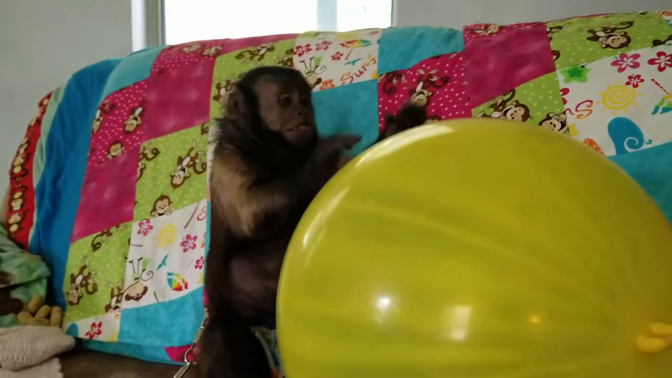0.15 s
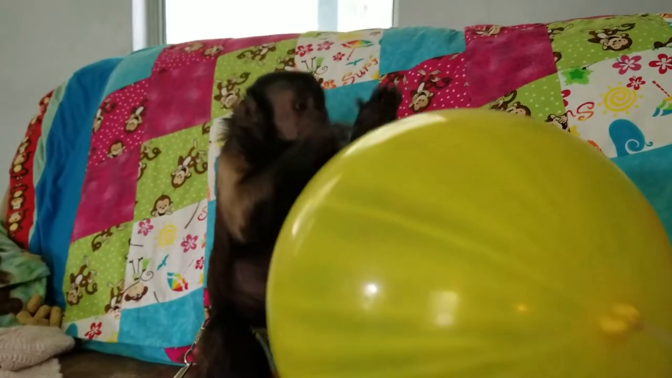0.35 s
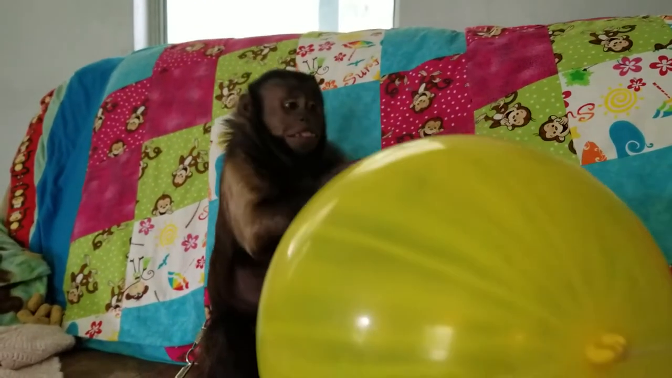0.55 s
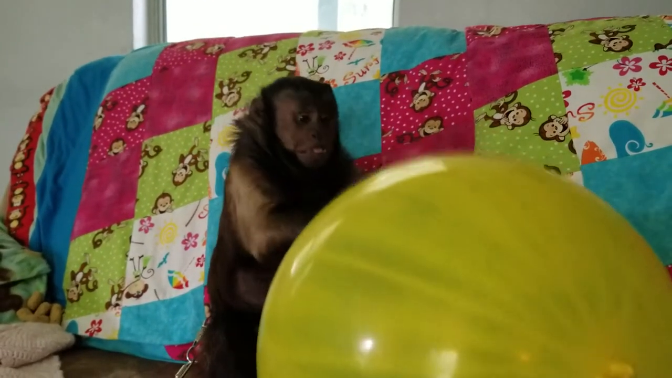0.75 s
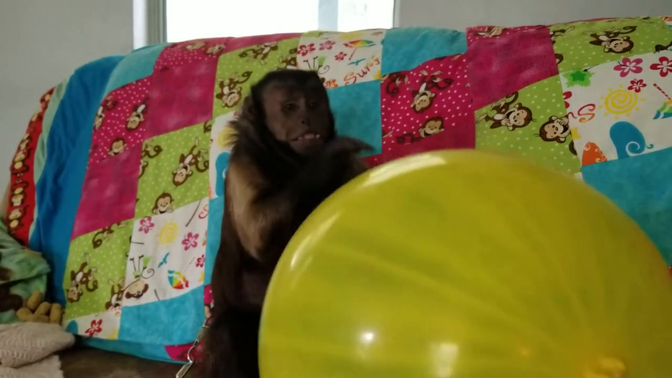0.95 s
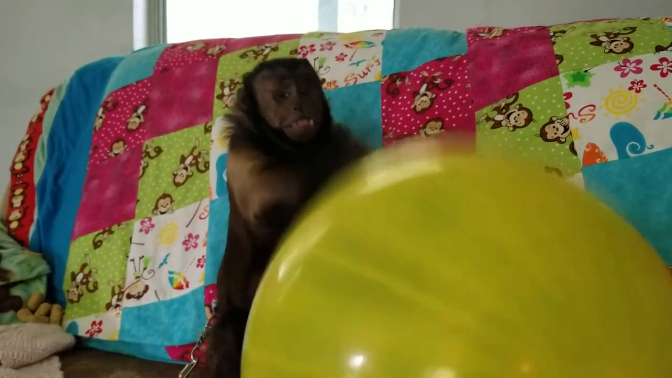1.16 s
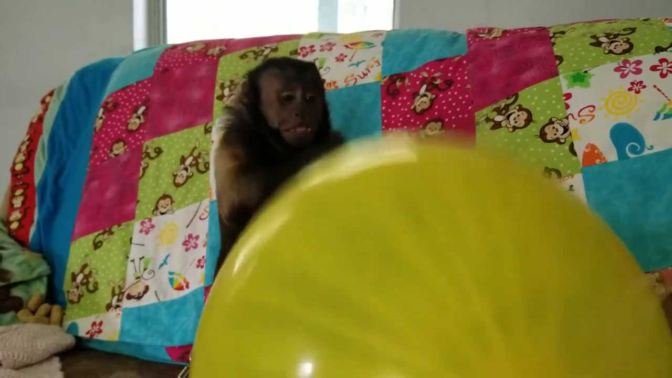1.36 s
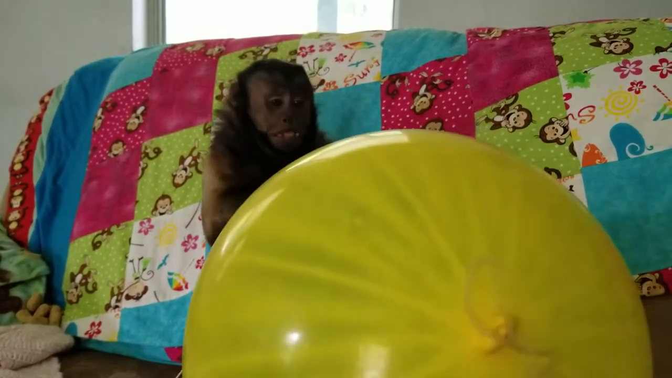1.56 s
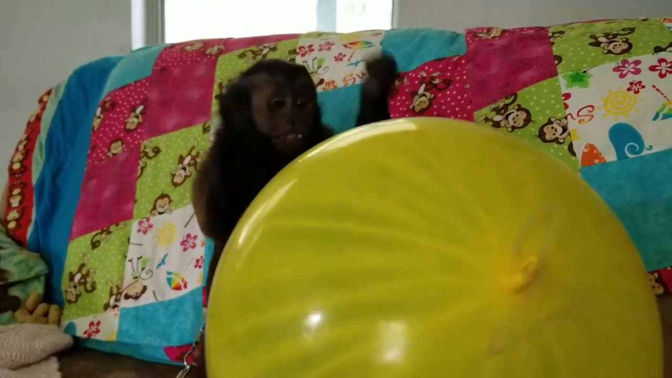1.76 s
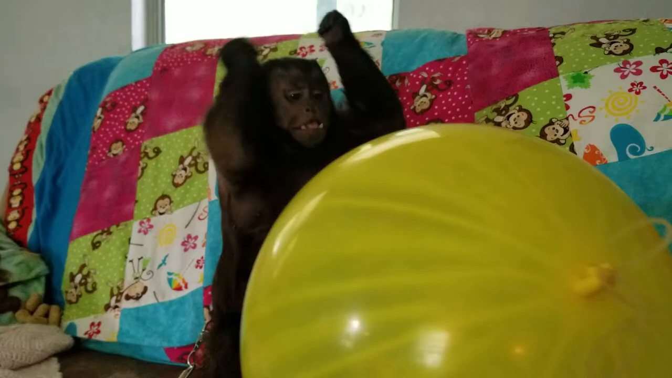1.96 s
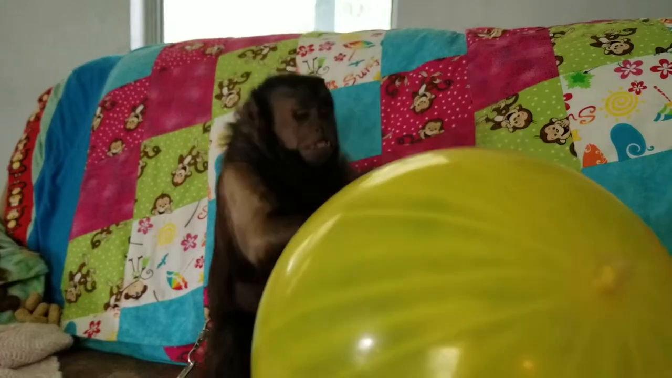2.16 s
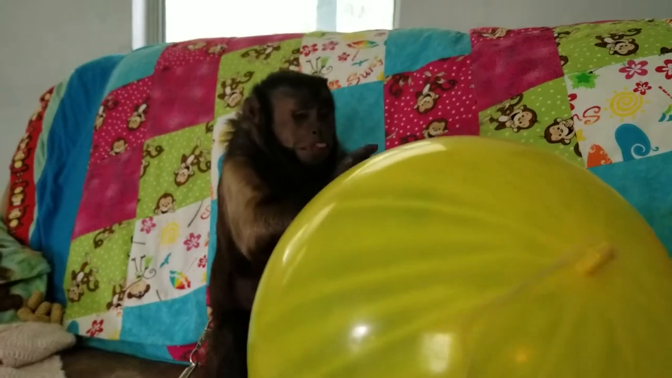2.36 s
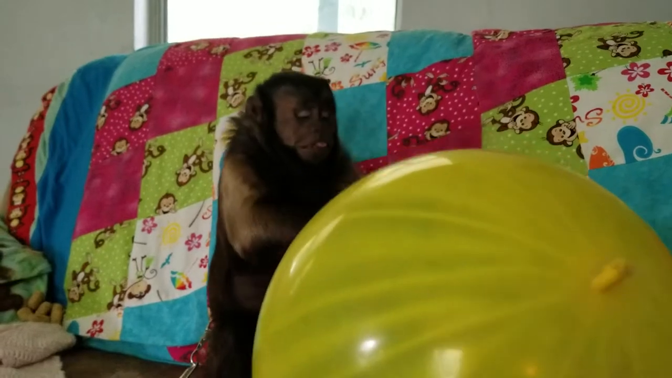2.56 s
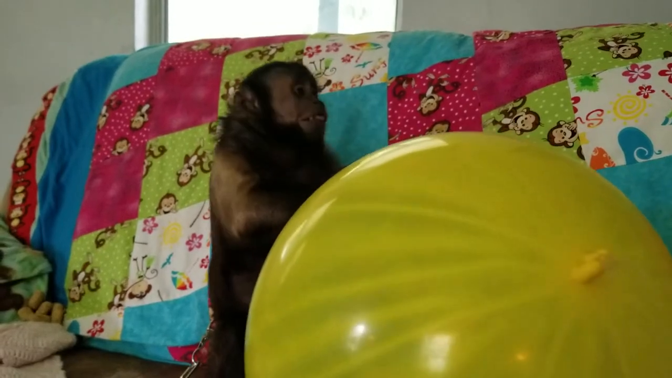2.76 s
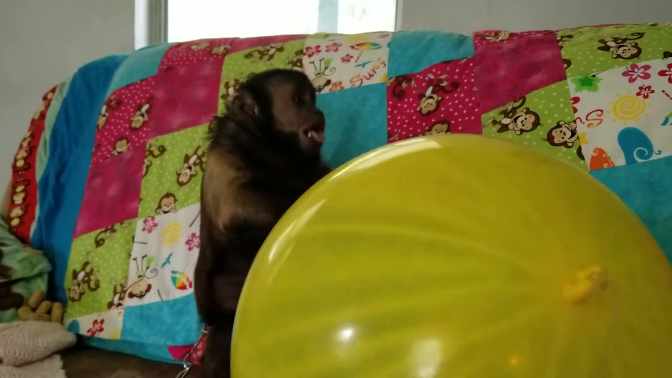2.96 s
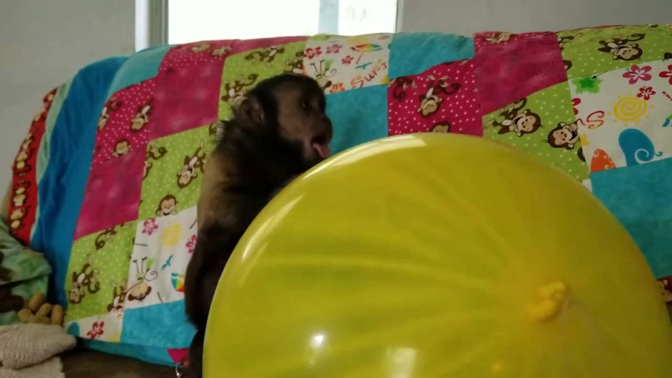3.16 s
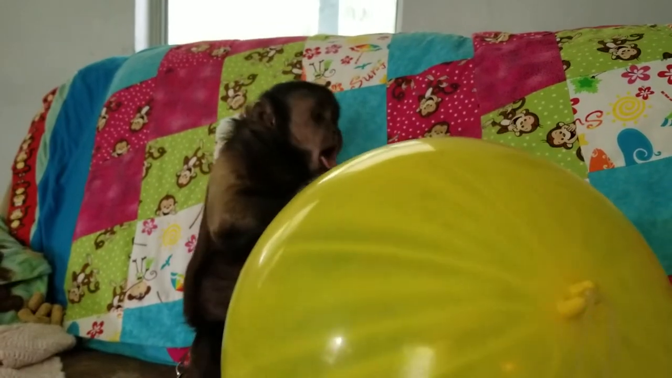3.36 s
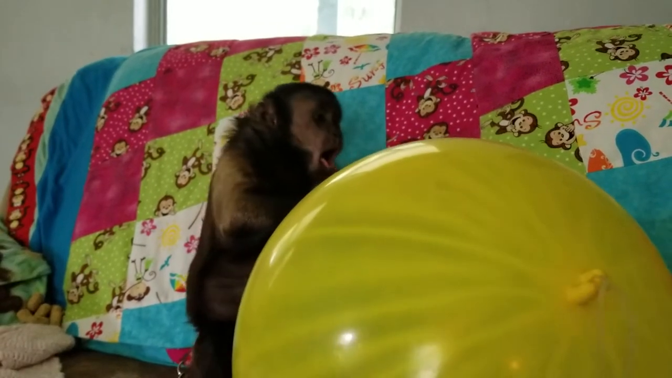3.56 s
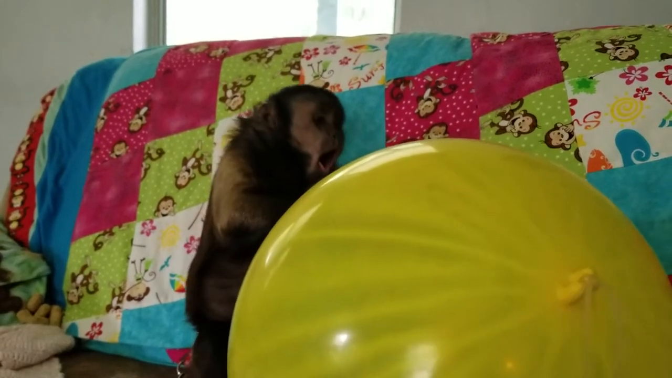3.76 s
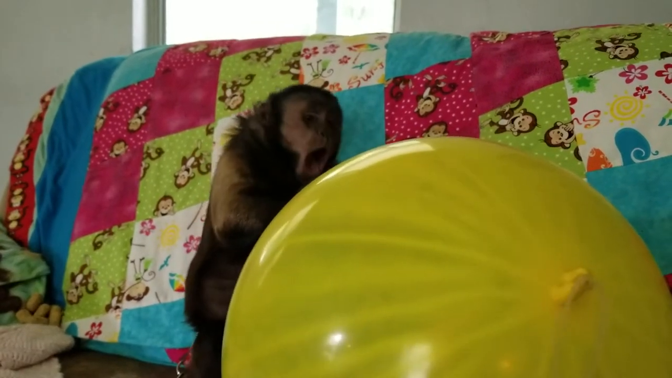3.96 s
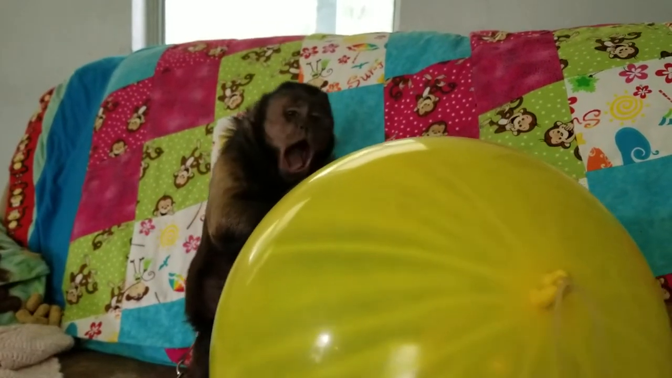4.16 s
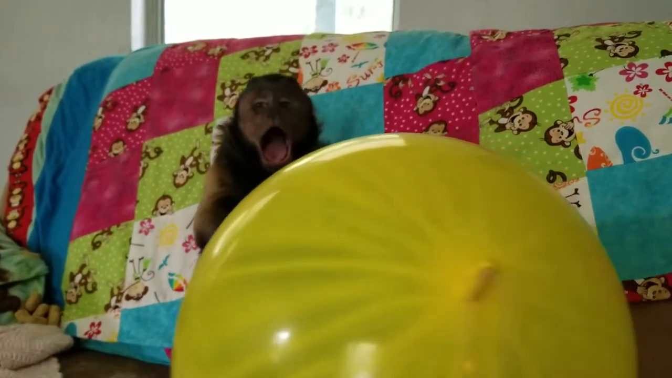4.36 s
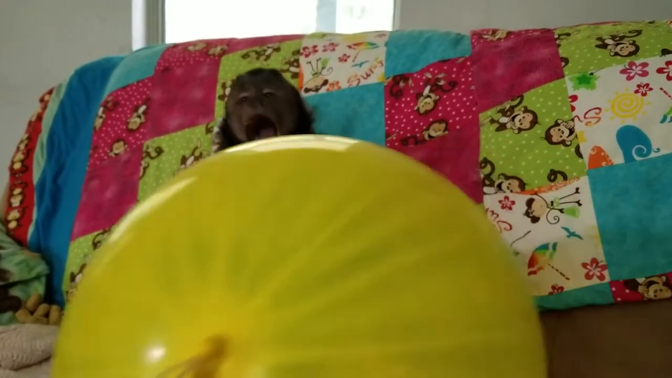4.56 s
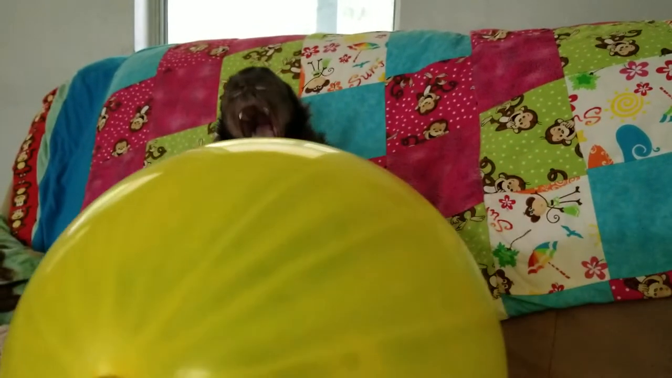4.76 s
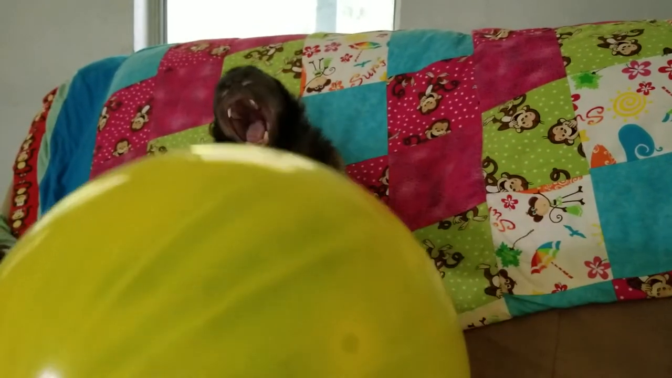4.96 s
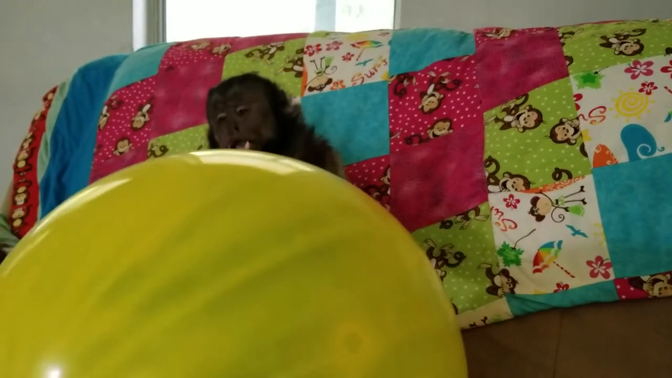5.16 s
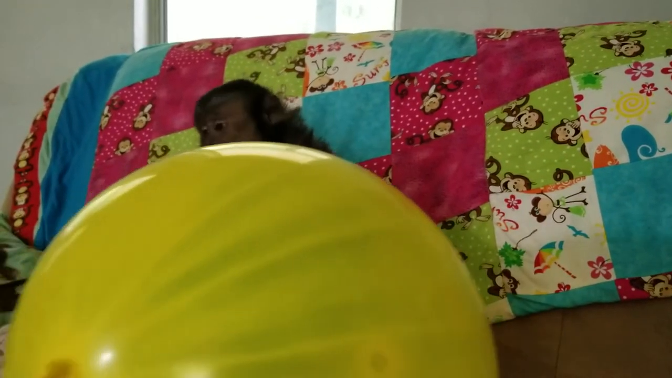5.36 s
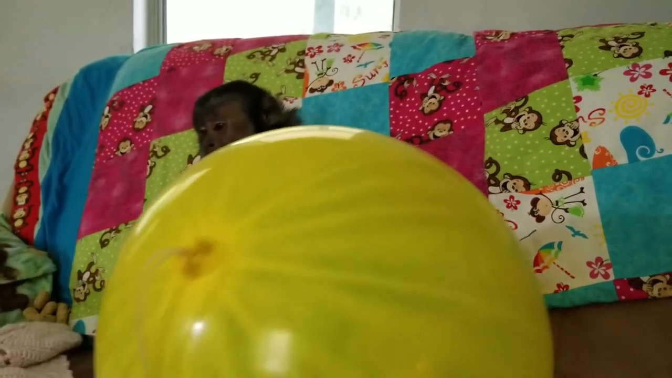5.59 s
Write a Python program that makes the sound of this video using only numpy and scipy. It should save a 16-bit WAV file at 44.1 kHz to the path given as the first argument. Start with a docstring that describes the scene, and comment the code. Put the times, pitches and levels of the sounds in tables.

```python
"""A fan's steady rush fills a small room as a monkey starts to shove, pat and rub a big latex balloon.
In each shove a paw lands with a thump, then slips and makes the skin wobble. Nails tick on the rubber,
ringing the air inside, and now and then it catches and squeaks. Near the end the balloon is dragged
round on a quilted couch: it hisses over the cloth and the rubber catches in short groans."""
import sys
import numpy as np
from scipy import signal
from scipy.fft import rfft, irfft, next_fast_len
from scipy.io import wavfile
from scipy.ndimage import uniform_filter1d

SR = 44100
rng = np.random.default_rng(int(sys.argv[2]) if len(sys.argv) > 2 else 0)


def wrap_up_sound(samples):
    """Save the sound to the file named by the first command line argument, as 16-bit audio."""
    columns = np.atleast_2d(samples).T
    # keep every value between -1 and 1, then stretch to whole-number steps
    tamed = np.clip(columns, -1, 1)
    steps = np.round(tamed * 32767).astype(np.int16)
    wavfile.write(sys.argv[1], SR, steps)


N = 248150
T = np.arange(N) / SR

# Cue levels are relative within their layer; the layer's function sets its place in the mix.
# A paw lands, then slips. Each row: landing time in seconds, landing level in dB, its rise in seconds,
# wait until the slip in seconds, slip level in dB.
SHOVES = [(0.008, -42, 0.019, 0.051, -40.5), (0.238, -39, 0.035, 0.051, -38),
          (0.428, -35.5, .01, .048, -28), (0.723, -39.5, 0.022, 0.049, -34),
          (0.947, -41, .024, .049, -44.5), (1.163, -37, 0.009, 0.027, -32),
          (1.363, -35.5, 0.018, 0.034, -25.5), (2.105, -30, 0.003, 0.039, -26.5),
          (2.357, -56, .004, 0.02, -44.5), (2.560, -44.5, 0.041, 0.043, -43.5)]
# Light brushes of fur and quilt. Each row: peak time in seconds, rasp level in dB, hiss level in dB,
# rise and fall time in seconds.
BRUSHES = [(0.568, -42, -70, 0.014), (0.855, -53, -57, 0.056), (1.068, -46, -49.5, 0.018),
           (1.441, -31, -51, .007), (1.630, -52, -54.5, .013), (2.662, -50.5, -49, 0.019),
           (2.790, -76, -60, .045), (2.955, -57.5, -66, 0.043), (3.080, -70, -58.5, 0.071),
           (3.261, -83, -60, 0.068), (4.270, -59.5, -62, 0.096), (4.419, -51, -62, 0.026)]
# The balloon bumps body and couch. Each row: time in seconds, level in dB, contact softness in ms.
BUMPS = [(0.4548, -10.5, 1.16), (0.464, -18.5, 0.9), (0.778, -27, 2.8), (1.179, -12.5, 1.02),
         (1.229, -25, 2.8), (1.381, -9.5, 1.36), (1.74, -36.5, 0.84), (2.038, -38.5, 1.8),
         (2.137, -20, 2.4), (2.288, -37.5, 1.7), (2.946, -41, 2.2), (4.215, -42, 1.8), (4.30, -40, 1.7),
         (4.987, -36, 2.4)]
# Nail ticks and knocks. Each row: start in seconds, level in dB, top of the snap in Hz.
NAIL_TICKS = [(0.560, -26.5, 3450), (1, -35, 9000), (1.16, -24.5, 1590), (1.173, -23, 3570),
              (1.415, -18.5, 4000), (1.439, -18.5, 3500), (1.486, -21, 3000), (1.736, -39, 1600),
              (2.107, -22, 4500), (2.359, -27, 2770), (2.388, -29.5, 1910), (2.589, -25.5, 2340),
              (3.854, -39, 1400)]
# Low groans near the air resonance, and higher squeaks. Each row: peak time in seconds, level in dB,
# pitch in Hz, half width in seconds, step from one harmonic to the next in dB.
GROANS = [(1.406, -39.5, 1290, 0.0081, -6), (1.637, -48.5, 230, 0.0068, -7), (1.747, -45, 222.5, .009, -16),
          (2.15, -33, 1260, 0.0066, -10.5), (2.586, -44.5, 1090, 0.0057, -17),
          (2.668, -42.5, 590, 0.0034, -7.5), (4.534, -40.5, 214, 0.0037, -19), (4.575, -28, 231, .011, -19),
          (4.592, -40.5, 921, 0.01, -8), (4.61, -41.5, 231, 0.019, -3.5), (4.624, -40, 762, 0.014, -2),
          (4.644, -39, 408, 0.0083, -7), (4.647, -34, 231, 0.007, -11), (4.854, -36.5, 227, 0.0043, -9),
          (4.897, -43.5, 260.4, 0.0087, -11), (4.983, -41.5, 236.4, .008, -29)]
# Grit of the catching rubber. Each row: peak time in seconds, half width in seconds, level in dB.
CATCH_RASPS = [(4.53, 0.011, -43), (4.581, 0.027, -36.5), (4.636, 0.027, -36), (4.835, 0.033, -43.5),
               (4.878, 0.023, -44), (4.956, 0.044, -44)]
# Strokes over the quilt. Each row: peak time in seconds, attack and release in seconds, level in dB.
DRAGS = [(4.42, .06, 0.08, -54), (4.63, 0.07, 0.013, -44.5), (4.84, 0.065, 0.055, -49),
         (4.965, 0.026, 0.006, -47.5)]
# The balloon's modes: slow skin wobbles, then the air inside.
# Each row: pitch in Hz, level in dB, seconds to die away by 60 dB.
BALLOON_MODES = [(44, 18, 0.12), (70, 4, 0.22), (99.3, 7, 0.49), (133, 12, 0.077), (236.3, -2.5, 0.2),
                 (320, -6, 0.056), (469.4, 6, 0.066), (542, 14, 0.027), (830, -45, 0.045), (930, 3, 0.058),
                 (1380, -4, 0.11), (1540, -25, .04)]
# The fan's faint hum and whine. Each row: pitch in Hz, level in dB.
FAN_TONES = [(65, -63), (582, -71), (716, -76), (899, -72.5), (1120, -78.5)]
# EQ curves that voice each noise. Each row: frequency in Hz, gain in dB.
FAN_EQ = [(20, 2), (45, -7.5), (65, 0), (115, 2), (160, -6.5), (330, -4.5), (410, -11), (560, -5),
          (1050, -2), (2000, -6), (2600, -4), (3600, -11.5), (4900, -13.5), (6100, -22.5), (16000, -33.5)]
RASP_EQ = [(120, -8.5), (300, 8), (500, 3.5), (900, 1), (1500, 0), (2800, 0), (4500, -7.5), (7000, -11.5),
           (15000, -24)]
HISS_EQ = [(1500, -7), (3500, 15.5), (6000, 5), (8000, 5.5), (10500, 4.5), (16000, 5)]
WOBBLE_EQ = [(18, -13), (30, -25), (50, 0), (100, -3.5), (170, -2.5), (240, -2), (350, -9), (700, -50),
             (2000, -53)]
DRAG_EQ = [(1500, -16), (3500, 10), (6000, 5.5), (9000, 4), (12000, 7.5), (16000, 6)]
# Stereo width of fan and reverb. Each row: frequency in Hz, side level against mid in dB.
FAN_WIDTH = [(60, -8), (110, -8), (200, -10), (380, -6), (700, -2), (1290, 0.5), (2380, 0.5), (4400, 1),
             (8120, 0.5), (15000, -1)]
ROOM_WIDTH = [(25, -24), (70, -6.5), (250, -11), (500, -1), (1500, 4), (3000, 4.5), (15000, 6.5)]

ROOM_T60_S, ROOM_TREBLE_T60_S = 0.29, 0.24
LAND_FALL_S, SLIP_RISE_S, SLIP_FALL_S = 0.03, 0.022, 0.016
LAND_HISS_DB, SLIP_HISS_DB = -5.5, -6.5  # hiss sends, relative to the shove's level
LAND_THUMP_DB, LAND_SOFT_MS = 8, 1.33  # thump send; softness of the paw
# The wobble grows more slowly than the rasp (slope in dB per dB) and outlasts it in a shove.
WOBBLE_DB, WOBBLE_SLOPE, WOBBLE_FALL_S = -12, 0.72, 0.043
AIR_RESONANCE_HZ = BALLOON_MODES[4][0]


def undb(db):
    """Decibels to gain."""
    return 10 ** (np.asarray(db) / 20)


def unit(x):
    """Scale to rms 1."""
    return x / np.sqrt(np.mean(x ** 2))


def equalise(x, curve):
    """Shape a sound with an EQ curve of (Hz, dB) points."""
    hz, db = np.transpose(curve)
    size = next_fast_len(x.shape[-1] + 4096)
    bins_hz = np.maximum(np.fft.rfftfreq(size, 1 / SR), 1)
    gain = undb(np.interp(np.log(bins_hz), np.log(hz), db))
    return irfft(rfft(x, size) * gain, size)[..., :x.shape[-1]]


def butter(x, order, hz, kind):
    """A plain low-, high- or band-pass filter."""
    return signal.sosfilt(signal.butter(order, hz, kind, fs=SR, output="sos"), x)


def convolve(x, response):
    """Pass a sound through an impulse response."""
    return signal.fftconvolve(np.atleast_2d(x), np.atleast_2d(response), axes=-1)[:, :N]


def drift(rate_hz):
    """Smooth random modulation with rms 1."""
    hold = int(SR / rate_hz)
    steps = rng.standard_normal(N)[np.arange(N) // hold]
    return unit(uniform_filter1d(uniform_filter1d(steps, hold), hold))


def swell(peak_s, half_width_s):
    """A bell-shaped rise and fall."""
    return np.exp(-((T - peak_s) / half_width_s) ** 2 / 2)


def wide_noise(size, width):
    """Stereo noise whose width depends on frequency."""
    mid, side = rng.standard_normal((2, size))
    side = equalise(side, width)
    return np.array([mid + side, mid - side])


def from_left(x, lead_ms):
    """A source off to the left reaches that channel first."""
    return np.array([x, np.roll(x, round(lead_ms * SR / 1000))])


def fan():
    """The bed: a steady rush of air from the left, with an uneven rumble and faint, wavering tones."""
    direct = from_left(rng.standard_normal(N), lead_ms=0.3)
    reflected = wide_noise(N, FAN_WIDTH) / np.sqrt(2)
    rush = unit(equalise(reflected + undb(-4) * direct, FAN_EQ))
    rumble = butter(rush, 2, 220, "low")
    rush += rumble * (undb(1.8 * drift(4)) - 1)
    tones = np.zeros(N)
    for hz, db in FAN_TONES:
        level = undb(db + 2.5 * drift(5))
        cycles = np.cumsum(hz + 2.38 * drift(12)) / SR
        tones += level * np.sqrt(2) * np.sin(2 * np.pi * cycles)
    return undb(-47.5) * rush + tones


def slips(per_second, spread_db):
    """The grain of friction: tiny stick-slip releases at random moments."""
    happens = rng.random(N) < per_second / SR
    size = undb(spread_db * np.clip(rng.standard_normal(N), -2, 2))
    return unit(happens * size * np.sign(rng.standard_normal(N)))


def balloon(force, ring_db):
    """A force on the skin radiates at once and also rings the balloon's modes."""
    t = T[:SR // 2]
    ring = sum(undb(db - 60 * t / t60) * np.cos(2 * np.pi * hz * t) for hz, db, t60 in BALLOON_MODES)
    return force + undb(ring_db) * convolve(force, ring)[0]


def room(x, wet_db):
    """Direct sound and a short diffuse tail that dulls as it dies."""
    t = T[:SR // 2]
    noise = wide_noise(len(t), ROOM_WIDTH)
    low = butter(noise, 1, 2500, "low")
    tail = low * undb(-60 * t / ROOM_T60_S) + (noise - low) * undb(-60 * t / ROOM_TREBLE_T60_S)
    tail *= t > 0.003  # pre-delay
    tail /= np.sqrt(np.sum(tail ** 2) / 2)
    return (x + undb(wet_db) * convolve(x, tail)) / np.hypot(1, undb(wet_db))


def cloth_hiss(force, per_second, eq, wet_db):
    """Fibres slip at three spots of the wide skin, each with its own lag from left to right."""
    spots = sum(from_left(slips(per_second, spread_db=0.5), lead_ms) for lead_ms in (0.2, 0.3, 0.37))
    return room(force * unit(equalise(spots, eq)), wet_db)


def scuff_power(peak_s, rasp_db, hiss_db, rise_s, fall_s):
    """Power envelopes of one scuff's rasp, hiss and wobble: the grip builds steadily, then lets go."""
    power = np.zeros((3, N))
    near = slice(max(int((peak_s - 0.1) * SR), 0), int((peak_s + 0.5) * SR))
    t = T[near] - peak_s
    grip = np.clip(1 + t / rise_s, 0, 1)
    layers = [(rasp_db, fall_s), (hiss_db, fall_s), (WOBBLE_DB + WOBBLE_SLOPE * rasp_db, WOBBLE_FALL_S)]
    power[:, near] = [(undb(db) * grip * np.exp(-np.maximum(t, 0) / decay)) ** 2 for db, decay in layers]
    return power


def scuffs():
    """Each shove or brush is a burst of slips: rubber rasp, cloth hiss and a low wobble of the skin."""
    power = np.zeros((3, N))
    for land_s, land_db, rise_s, wait_s, slip_db in SHOVES:
        power += scuff_power(land_s, land_db, land_db + LAND_HISS_DB, rise_s, LAND_FALL_S)
        power += scuff_power(land_s + wait_s, slip_db, slip_db + SLIP_HISS_DB, SLIP_RISE_S, SLIP_FALL_S)
    for peak_s, rasp_db, hiss_db, fade_s in BRUSHES:
        power += scuff_power(peak_s, rasp_db, hiss_db, fade_s, fade_s)
    rasp_force, hiss_force, wobble_force = np.sqrt(power)
    clumps = undb(2.2 * drift(330))  # the rubber grabs and frees every few milliseconds
    rasp = rasp_force * unit(equalise(clumps * slips(per_second=5100, spread_db=2), RASP_EQ))
    wobble = wobble_force * unit(equalise(slips(per_second=700, spread_db=3.5), WOBBLE_EQ))
    return (room(balloon(rasp, ring_db=-53), wet_db=0)
            + undb(1.5) * cloth_hiss(hiss_force, per_second=5000, eq=HISS_EQ, wet_db=1)
            + undb(-2.5) * room(balloon(wobble, ring_db=-57.5), wet_db=-1))


def thumps():
    """A blow dents the skin, which springs back: one swing of pressure, slower for a softer contact."""
    landings = [(land_s, db + LAND_THUMP_DB, LAND_SOFT_MS) for land_s, db, *_ in SHOVES]
    force = np.zeros(N)
    for hit_s, db, soft_ms in landings + list(BUMPS):
        soft_s = soft_ms / 1000
        force += undb(db) * (hit_s - T) / soft_s * swell(hit_s, soft_s)
    return undb(-1) * room(balloon(force, ring_db=-59), wet_db=-1)


def nail_ticks():
    """A nail snaps off the tight rubber: a crack of a few milliseconds, and the air inside answers."""
    force = np.zeros(N)
    t = T[:SR // 20]
    for start_s, db, top_hz in NAIL_TICKS:
        crack = rng.standard_normal(len(t)) * np.exp(-t / 0.0015)
        crack[0] -= 5  # a hard click on the attack
        snap = butter(crack, 2, [200, top_hz], "band")
        start = int(start_s * SR)
        force[start:start + len(t)] += undb(db) * snap / np.abs(snap).max()
    return undb(-3) * room(balloon(force, ring_db=-43.5), wet_db=-6)


def stick_slip_tone(cycles, step_db):
    """The voice of the rubber: three harmonics, each weaker than the last by the same step."""
    return np.sqrt(2) * sum(undb(k * step_db) * np.sin(2 * np.pi * ((k + 1) * cycles + rng.random()))
                            for k in range(3))


def groans():
    """Stick and slip lock into short groans and squeaks; the rasp comes in puffs at the air resonance."""
    tones = np.zeros(N)
    clock = np.cumsum(1 + 0.008 * drift(70)) / SR  # the skin's changing stretch bends all pitches together
    for peak_s, db, hz, half_width_s, step_db in GROANS:
        near = np.abs(T - peak_s) < 5 * half_width_s
        envelope = undb(db) * swell(peak_s, half_width_s)[near]
        tones[near] += envelope * stick_slip_tone(hz * clock[near], step_db)
    tones *= undb(0.89 * drift(260))  # a fast flutter roughens the tone
    cycle = AIR_RESONANCE_HZ * clock % 1
    puffs = slips(per_second=6000, spread_db=0) * np.exp(-cycle / 1.4)
    grip = sum(undb(db) * swell(peak_s, half_width_s) for peak_s, half_width_s, db in CATCH_RASPS)
    rasp = grip * unit(equalise(puffs, RASP_EQ))
    return room(tones, wet_db=-13) + undb(-3.3) * room(balloon(rasp, ring_db=-56), wet_db=-2)


def drags():
    """The balloon slides over the quilt in strokes that gather speed and stop, with a fine, high hiss."""
    speed = sum(undb(db) * swell(peak_s, np.where(T < peak_s, attack_s, release_s))
                for peak_s, attack_s, release_s, db in DRAGS)
    speed *= undb(1.3 * drift(60))
    return undb(4.5) * cloth_hiss(speed, per_second=7800, eq=DRAG_EQ, wet_db=-2)


def scene():
    """The mix: the balloon sits a touch left of centre, over the fan."""
    handling = scuffs() + thumps() + nail_ticks() + groans() + drags()
    return handling * undb([[0.6], [-0.6]]) + fan()


def record(dry):
    """Roll off the deepest rumble and cut the very top steeply."""
    top_cut = signal.ellip(10, 0.2, 70, 15900, fs=SR, output="sos")
    return signal.sosfilt(top_cut, butter(dry, 1, 30, "high"))


dry = scene()
out = record(dry)
wrap_up_sound(out)
```